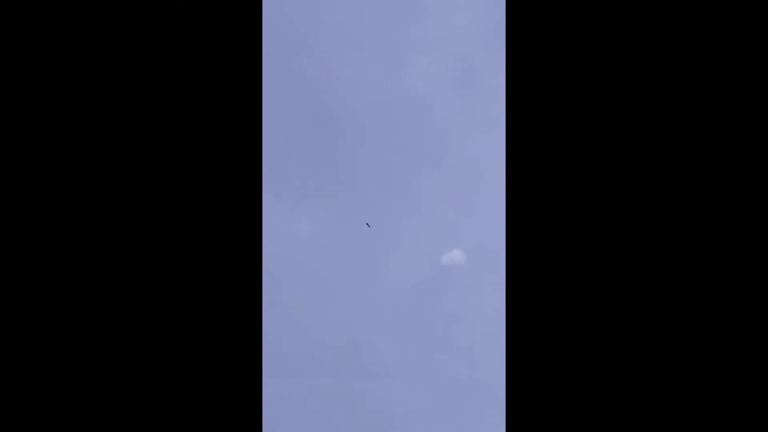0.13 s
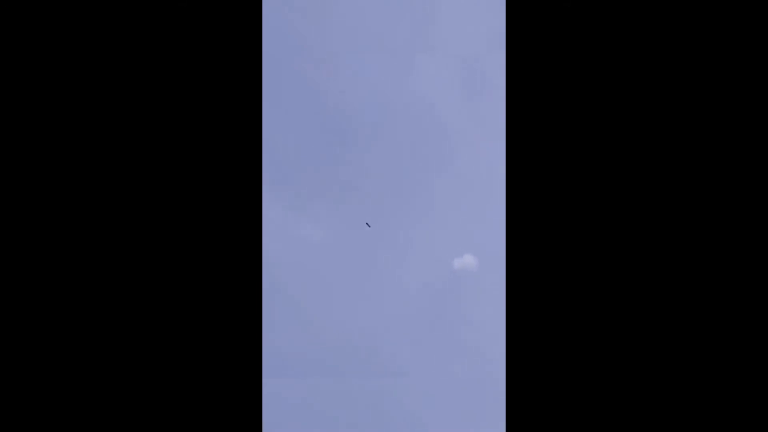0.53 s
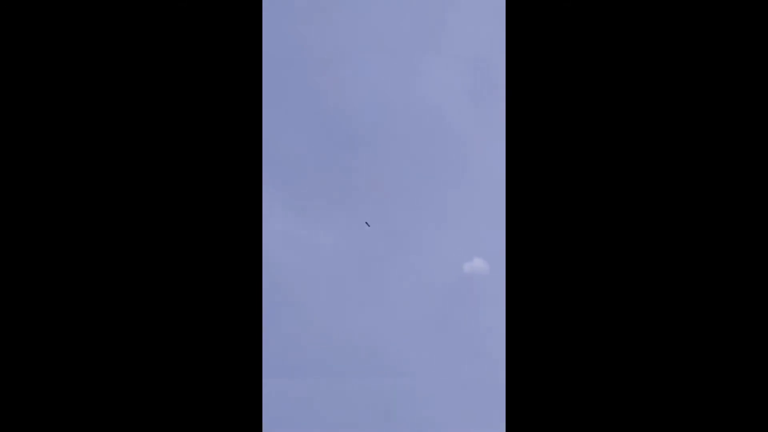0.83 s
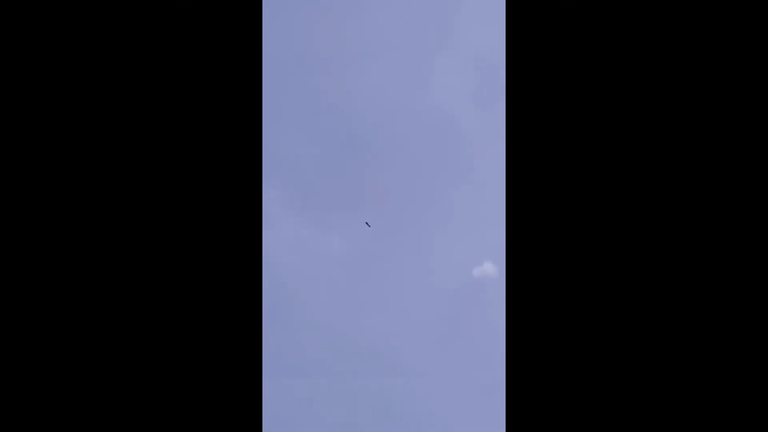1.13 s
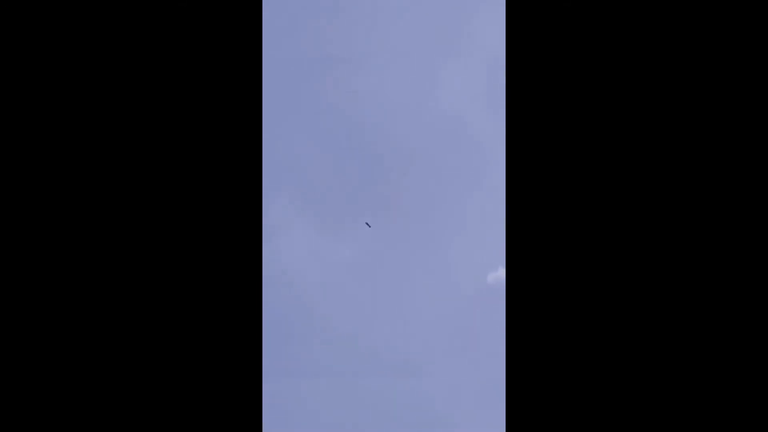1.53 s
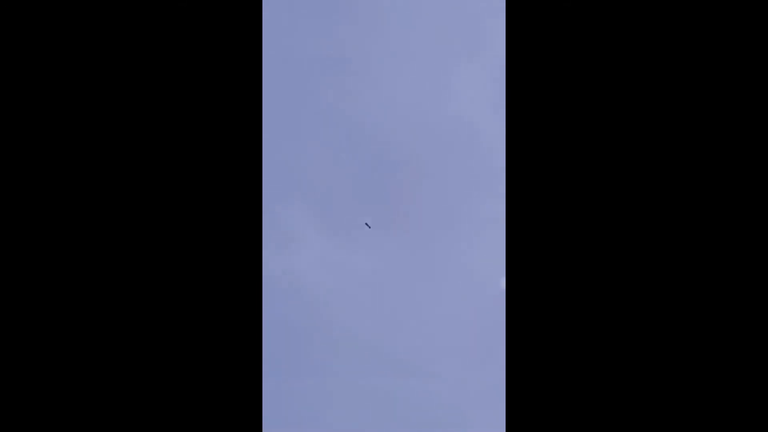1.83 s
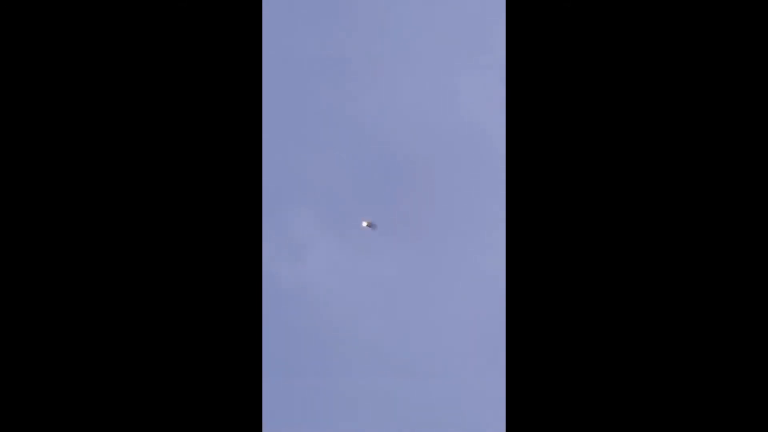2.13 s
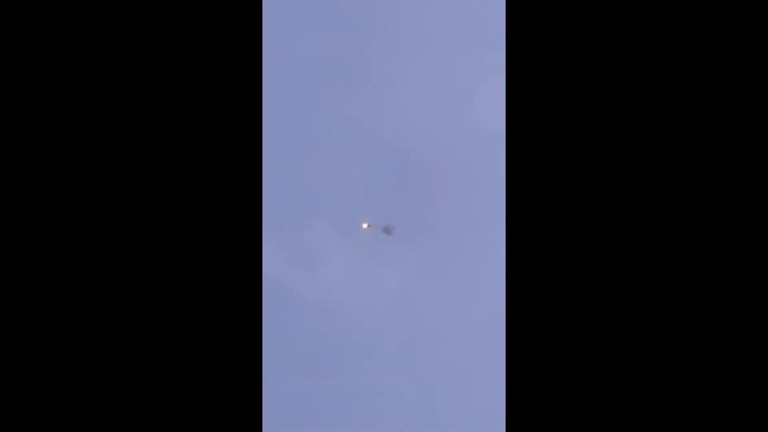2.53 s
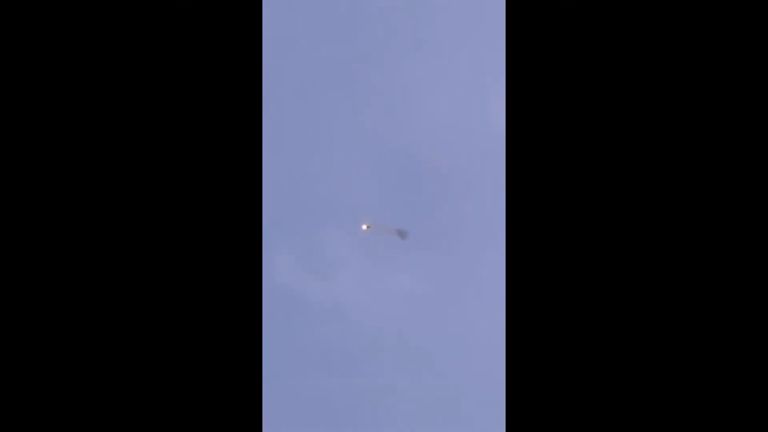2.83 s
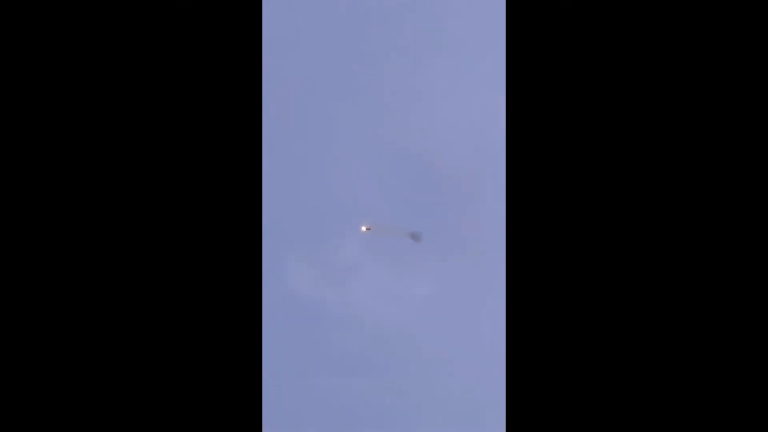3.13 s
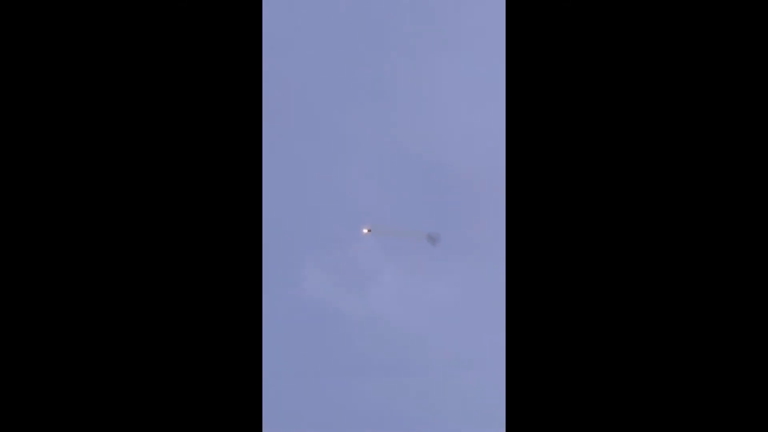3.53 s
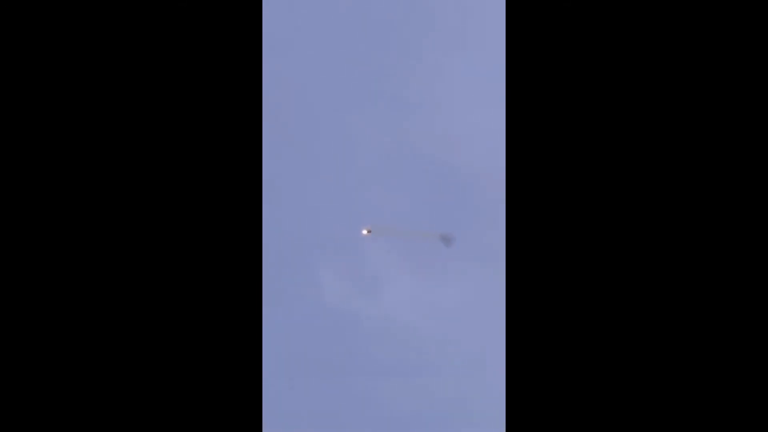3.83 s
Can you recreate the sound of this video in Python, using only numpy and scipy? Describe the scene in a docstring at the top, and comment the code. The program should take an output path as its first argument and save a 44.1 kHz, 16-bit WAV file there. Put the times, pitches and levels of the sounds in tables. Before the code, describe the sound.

Sonic boom of a high rocket, heard from far off in open country, in stereo. Until 1.85 s there is only quiet low wind, a soft distant rush swelling slightly and a faint steady tone from about 1 s. Whip-like bangs strike at 1.86, 2.12 and 2.25 s, with hiss and low thuds. Deep exhaust rumble surges on to 4 s, its roar fading, with irregular cracks, short echoes and grainy ground returns.

```python
"""Open country under a rocket climbing high; a stereo recorder stands far off in light wind.
Wind buffets over a distant rush and a faint far-off tone until the sonic boom arrives: three whip-like
bangs, each a pressure front swept from treble to bass, set in sprays of noise hiss with low thuds.
The exhaust rumbles on as shaped noise, surging and patchy, while its shock fronts crack one by one,
each with a weaker echo and a grainy return from the ground."""
import sys
import numpy as np
from scipy import signal
from scipy.fft import rfft, irfft
from scipy.io import wavfile
from scipy.ndimage import uniform_filter1d

SR = 44100
rng = np.random.default_rng(int(sys.argv[2]) if len(sys.argv) > 2 else 0)


def dump(signal):
    """Clip the signal to [-1, 1] and save it as 16-bit WAV at the path in sys.argv[1]."""
    limited = np.clip(np.atleast_2d(signal).T, -1, 1)
    pcm = np.round(limited * 32767).astype(np.int16)
    wavfile.write(sys.argv[1], SR, pcm)


N = 176400  # 4 s

# Every colour is a relative spectrum. Pans and treble pans are left over right, in dB.
# Light wind at the microphone, colour: pitch_hz, level_db (per Hz)
WIND_COLOUR = [(12, -19.5), (20, -1), (32, -10), (49, -6), (69, -0.5), (167, -6.5), (192, -8), (350, -16),
               (460, -44.5), (770, -120)]
WIND_DB, WIND_PAN_DB, WIND_GUST_DB = -36, 3, 0.8
WIND_LIKENESS = 0.78  # correlation of left and right

# Distant rush, level: time_s, level_db
RUSH_LEVEL = [(0, -42.5), (1.2, -41.5), (1.8, -38.5), (2.3, -49.5), (3, -47.5), (4, -41.5)]
# Distant rush, colour: pitch_hz, level_db (per Hz)
RUSH_COLOUR = [(150, -36), (260, -16), (400, -7.5), (520, -7), (700, -6), (1150, -8), (1800, -15.5),
               (2600, -25), (3600, -32), (5000, -44.5), (8000, -56.5)]
# Distant rush, likeness of left and right: pitch_hz, correlation
RUSH_LIKENESS = [(300, 0.55), (1200, 0.85), (2600, 0.93), (6000, 0.16)]
RUSH_DRIFT_DB = 0.31

# Far-off tone, level: time_s, level_db
HUM_LEVEL = [(1.0, -63), (1.15, -49.5), (1.85, -50), (2.5, -61.5)]
HUM_HZ, HUM_WAVER_HZ, HUM_WAVER_DB = 603.6, 1.2, 2

# Bangs of the boom: start_s, level_db (relative), treble_db (tilt)
BANGS = [(1.8614, -0.5, -2), (2.1247, -3.5, -7), (2.253, -2, -5)]
# Bang, colour: pitch_hz, level_db
BANG_COLOUR = [(20, -16), (45, 5.5), (100, 3.5), (190, 2.5), (320, 0.5), (500, -3.5), (1000, -8),
               (2000, -19), (4000, -24.5), (5700, -14.5), (7200, -27.5), (8600, -48), (13000, -49)]
# The recorder's two ports hear the sweep out of step: pitch_hz, left_lead_radians
PORT_PHASE = [(250, 0), (700, 0.4), (1250, 3.5), (2500, 4.5), (4000, 9), (5500, 8.5), (7000, 5)]
BANG_DB, BANG_TREBLE_PAN_DB = 32.5, -3.5
BANG_ECHO_S, BANG_ECHO_DB, BANG_ECHO_TREBLE_DB = 0.0101, -6.5, -11  # near reflection
SWEEP_S, SWEEP_POWER = 0.002108, 0.588  # delay at 1 kHz; it grows with the period to this power

# Sprays of hiss round the bangs: crest_s, level_db, half_length_s (to 1/e), pan_db
SPRAYS = [(1.864, -15.5, 0.0032, 5), (2.121, -20.5, .013, -3), (2.251, -22, 0.0091, 6.5)]
# Spray, colour: pitch_hz, level_db (per Hz)
SPRAY_COLOUR = [(200, 6), (1000, 8.5), (2500, 0.5), (4200, -7), (6000, -15.5), (8000, -21.5),
                (10000, -35.5), (13000, -47)]
HISS_LIKENESS = 0.15  # correlation of left and right, in sprays and exhaust hiss

# Exhaust, deep rumble surging: time_s, level_db
RUMBLE_LEVEL = [(1.87, -20), (1.93, -22), (2.0, -17), (2.06, -19), (2.15, -15), (2.19, -24), (2.23, -15.5),
                (2.33, -16.5), (2.42, -13.5), (2.88, -16), (2.93, -14.5), (2.97, -17), (3.19, -15),
                (3.23, -20), (3.27, -15.5), (3.47, -15.5), (3.5, -20), (3.53, -16.5), (3.72, -17),
                (3.77, -21), (3.88, -15), (4, -22)]
# Exhaust, roar: time_s, level_db
ROAR_LEVEL = [(1.87, -54), (1.95, -25.5), (2.06, -27.5), (2.42, -26.5), (2.72, -29), (2.98, -28.5),
              (3.2, -31), (3.35, -33), (4, -38.5)]
# Exhaust, hiss round the bangs and after: time_s, level_db
HISS_LEVEL = [(1.865, -38), (1.89, -44), (1.92, -37), (1.98, -34.5), (2.06, -41.5), (2.1, -35.5),
              (2.15, -42), (2.22, -30.5), (2.275, -46), (2.32, -38), (2.42, -38.5), (2.52, -48),
              (2.75, -59.5), (4, -54)]
# Rumble, colour: pitch_hz, level_db (per Hz)
RUMBLE_COLOUR = [(10, -15.5), (22, -3), (45, -1), (70, 0), (105, 1), (128, -3), (150, -12), (190, -14),
                 (240, -29.5), (400, -25.5), (1000, -93)]
# Roar, colour: pitch_hz, level_db (per Hz)
ROAR_COLOUR = [(100, 4.5), (250, 0.5), (380, 0), (550, -2.5), (750, -4), (1400, -15.5), (2600, -28),
               (4400, -41), (6000, -53), (9000, -76)]
# Hiss, colour: pitch_hz, level_db (per Hz)
HISS_COLOUR = [(400, 5.5), (1000, 7.5), (2600, 3.5), (4400, -4), (5700, -3.5), (6600, -12.5), (7600, -22.5),
               (9500, -54.5), (13000, -50)]
# Rumble and roar, likeness of left and right: pitch_hz, correlation
EXHAUST_LIKENESS = [(130, .965), (380, 0.92), (650, 0.57), (1200, .25), (2500, 0.55)]
ONSET_S = 0.011  # the exhaust fades in over this time
RUMBLE_EVEN_S = 0.086  # the rumble's own strength is evened out over this time
ROAR_FLUTTER_DB, HISS_FLUTTER_DB, HISS_GRIT_DB = 2, 2, 1.5
# Patches of the spectrum that swell and fade: depths, width, length
ROAR_PATCH_DB, HISS_PATCH_DB, PATCH_WIDTH_HZ, PATCH_S = 3.5, 6.5, 260, 0.06

# Dull thuds of the boom: start_s, peak_level_db, pitch_hz
THUDS = [(1.886, -12, 23.3), (1.998, -15.5, 113), (2.016, -6, 151), (2.095, -11, 119), (2.159, -14.5, 30.6)]
THUD_CYCLES = 0.56  # cycles up to the crest of a thud's envelope

# Shock cracks of the exhaust: start_s, level_db (relative), treble_db (tilt), echo_db (below its crack)
CRACKS = [(1.9441, -2.5, -1.5, -4), (2.0186, -6, -14, -18), (2.1170, -10, 2, -20),
          (2.2341, -0.5, -11, -1.5), (2.396, -1.5, 0.5, -4), (2.4615, -15.5, -7, -1),
          (2.6217, -11, -25.5, -13), (2.853, -3.5, -17, -22), (3.0653, 0, -21, -12),
          (3.1140, -17.5, -9, -12), (3.25, -4, -19, -14), (3.2969, -9, -12.5, -12),
          (3.348, -12.5, -21, -16), (3.4231, -9.5, -7, -4.5), (3.4320, -8, -12.5, -6),
          (3.5361, -4, -3.5, -15.5), (3.6333, -6.5, -7.5, -9), (3.6753, -15, -12, -14),
          (3.7065, -6.5, -10, -10.5), (3.8996, -5, -5, -8.5), (3.9389, -15, -5, -4)]
# Crack, colour: pitch_hz, level_db
CRACK_COLOUR = [(20, 1.5), (100, 7.5), (300, 0), (700, -2.5), (1500, -8.5), (2500, -11), (3800, -27),
                (5800, -21.5), (7800, -27), (9500, -52.5), (13000, -65)]
CRACK_DB = 21
ECHO_S, ECHO_TREBLE_DB = 0.0304, -5.5
# Faint fronts among the cracks, level relative to them
CRACKLE_PER_S, CRACKLE_DB, CRACKLE_SPREAD_DB, CRACKLE_TREBLE_DB = 71, -26, 6.5, -17.5
# Grainy return of each front, colour: pitch_hz, level_db
SCATTER_COLOUR = [(200, -2.5), (1500, -12.5), (3500, 13.5), (7000, 13)]
SCATTER_DB, SCATTER_S, SCATTER_GRAIN_DB = -20.5, 0.018, 9  # level before colour, crest time, grain spread
CRACK_SIDE_DB, CRACK_SIDE_S = -15, 0.00082  # stereo burst at each front: level, decay time
FRONT_GRAIN_DB, FRONT_GRAIN_S = -3.5, 0.0055  # ragged tail of each front: level, decay time

# Recorder's own hiss, colour: pitch_hz, level_db (per Hz)
SELF_NOISE_COLOUR = [(1000, -6.5), (6000, 3.5), (13000, -1)]
SELF_NOISE_DB, TOP_HZ = -63, 13300

LEFT_RIGHT = np.array([[1], [-1]])


def undb(db):
    """Decibels to gain."""
    return 10 ** (np.asarray(db) / 20)


def curve(rows):
    """A table's second column joined by straight lines in time."""
    rows = np.array(rows)
    return np.interp(np.arange(N) / SR, rows[:, 0], rows[:, 1])


def bins(size):
    """Frequencies of a spectrum, kept above zero."""
    return np.maximum(np.arange(size // 2 + 1) * SR / size, 1)


def along(points, hz):
    """Points joined on a log-frequency axis."""
    points = np.array(points)
    return np.interp(np.log(hz), np.log(points[:, 0]), points[:, 1])


def walk(rate_hz):
    """Random motion with a spread of 1, its spectrum falling away smoothly around the rate."""
    slow = irfft(rfft(rng.standard_normal(N)) * np.exp(-(bins(N) / rate_hz) ** 2), N)
    return slow / slow.std()


def noise(colour, likeness):
    """Stereo noise of rms 1 with a given colour and left-right correlation."""
    likeness = np.clip(likeness, -1, 1)
    mid, side = rfft(rng.standard_normal((2, N))) * undb(along(colour, bins(N)))
    spectra = mid * np.sqrt(1 + likeness) + LEFT_RIGHT * side * np.sqrt(1 - likeness)
    out = irfft(spectra, N)
    return out / out.std()


def front(colour, treble_db, size=4096):
    """Spectrum of a causal pressure jump; the air has taken more or less of its treble."""
    hz = bins(size)
    tilt = along([(1200, 0.13), (5500, 0.93), (10000, 1.8)], hz)
    cepstrum = irfft(np.log(undb(along(colour, hz) + treble_db * tilt)))
    # Folding the cepstrum gives minimum phase: nothing sounds ahead of the front
    cepstrum[1:size // 2] *= 2
    cepstrum[size // 2 + 1:] = 0
    return -np.exp(rfft(cepstrum))


def add(out, at_s, sound):
    """Mixes a sound in at a time."""
    i = int(np.clip(round(at_s * SR), 0, N))
    out[..., i:i + sound.shape[-1]] += sound[..., :N - i]


def wind():
    """Light wind at the microphone: low noise, alike in both channels, that gusts a little."""
    level_db = WIND_DB + WIND_GUST_DB * walk(6.6) + LEFT_RIGHT * WIND_PAN_DB / 2
    return noise(WIND_COLOUR, WIND_LIKENESS) * undb(level_db)


def distant_rush():
    """Distant rush: noise that swells towards the boom, sinks after it and comes up again."""
    rush = noise(RUSH_COLOUR, along(RUSH_LIKENESS, bins(N)))
    return rush * undb(curve(RUSH_LEVEL) + RUSH_DRIFT_DB * walk(1.7))


def hum():
    """A faint far-off tone, a sine wavering in pitch and level, up before the boom covers it."""
    hz = HUM_HZ + HUM_WAVER_HZ * walk(2)
    tone = np.sqrt(2) * np.sin(2 * np.pi * np.cumsum(hz) / SR)
    return undb(curve(HUM_LEVEL) + HUM_WAVER_DB * walk(9.2)) * tone


def bangs(size=4096):
    """Each bang arrives treble first and falls to the bass in a few ms; a near reflection follows."""
    out, hz = np.zeros((2, N)), bins(size)
    delay_s = SWEEP_S * (1000 / np.maximum(hz, 60)) ** SWEEP_POWER
    # Delay summed over frequency is the phase of the sweep
    sweep_phase = 2 * np.pi * np.cumsum(delay_s) * SR / size
    falling = np.exp(1j * (LEFT_RIGHT / 2 * along(PORT_PHASE, hz) - sweep_phase))
    arrivals = [(0, 0, 0), (BANG_ECHO_S, BANG_ECHO_DB, BANG_ECHO_TREBLE_DB)]  # direct, reflected
    for start_s, level_db, treble_db in BANGS:
        for late_s, gain_db, dull_db in arrivals:
            ports = np.array([front(BANG_COLOUR, treble_db + dull_db + side * BANG_TREBLE_PAN_DB)
                              for side in (0.5, -0.5)])
            add(out, start_s + late_s, undb(BANG_DB + level_db + gain_db) * irfft(ports * falling))
    return out


def sprays():
    """Short swells of bright noise hiss in which the bangs sit."""
    t = np.arange(N) / SR
    swell = np.zeros((2, N))
    for crest_s, level_db, half_length_s, pan_db in SPRAYS:
        bell = np.exp(-((t - crest_s) / half_length_s) ** 2)
        swell += undb(level_db + LEFT_RIGHT / 2 * pan_db) * bell
    return noise(SPRAY_COLOUR, HISS_LIKENESS) * swell


def patchy(sound, depth_db, size=1024):
    """Patches of the noise's spectrum swell and fade at random."""
    spectra = signal.stft(sound, nperseg=size)[2]
    field = rng.standard_normal(spectra.shape[1:])
    spans = [PATCH_WIDTH_HZ * size / SR, PATCH_S * 2 * SR / size]  # bins, frames
    for axis, span in enumerate(spans):
        field = uniform_filter1d(field, max(1, round(span)), axis=axis)
    gain = undb(depth_db * np.tanh(field / field.std()))
    gain = gain / np.sqrt(np.mean(gain ** 2))
    return signal.istft(spectra * gain, nperseg=size)[1][:, :N]


def exhaust():
    """Surging rumble, patchy roar and gritty hiss, all noise arriving behind the first bang."""
    likeness = along(EXHAUST_LIKENESS, bins(N))
    deep = noise(RUMBLE_COLOUR, likeness)
    strength = np.sqrt(uniform_filter1d(np.mean(deep ** 2, axis=0), int(RUMBLE_EVEN_S * SR)))
    rumble = deep / strength * undb(curve(RUMBLE_LEVEL))

    roar = patchy(noise(ROAR_COLOUR, likeness), ROAR_PATCH_DB)
    roar = roar * undb(curve(ROAR_LEVEL) + ROAR_FLUTTER_DB * walk(54))

    hiss = patchy(noise(HISS_COLOUR, HISS_LIKENESS), HISS_PATCH_DB)
    hiss_db = curve(HISS_LEVEL) + HISS_FLUTTER_DB * walk(53) + HISS_GRIT_DB * walk(500)
    hiss = hiss * undb(hiss_db)

    onset = np.clip((np.arange(N) / SR - BANGS[0][0]) / ONSET_S, 0, 1)
    return (rumble + roar + hiss) * onset


def thuds():
    """Low pressure swings of the boom that die within a few cycles."""
    out, t = np.zeros(N), np.arange(SR // 2) / SR
    for start_s, peak_db, pitch_hz in THUDS:
        age = t * pitch_hz / THUD_CYCLES
        envelope = age * np.exp(1 - age)
        add(out, start_s, undb(peak_db) * envelope * np.sin(2 * np.pi * pitch_hz * t))
    return out


def ground_return(size=4096):
    """What follows each front: a grainy return from the ground, a stereo burst and a ragged tail."""
    t = np.arange(size) / SR
    grains = rng.standard_normal((2, size)) * undb(SCATTER_GRAIN_DB * rng.standard_normal(size))
    far = grains * t * np.exp(-t / SCATTER_S)
    far_gain = undb(SCATTER_DB + along(SCATTER_COLOUR, bins(size)))
    far = irfft(rfft(far / np.linalg.norm(far[0])) * far_gain)
    near = rng.standard_normal((2, size)) * np.exp(-t / CRACK_SIDE_S)
    near = undb(CRACK_SIDE_DB) * near / np.linalg.norm(near[0])
    ragged = rng.standard_normal(size) * np.exp(-t / FRONT_GRAIN_S)
    ragged = undb(FRONT_GRAIN_DB) * ragged / np.linalg.norm(ragged)
    return far + near + ragged


def cracks():
    """Single shock fronts, each with a duller echo and a ground return, among many faint ones."""
    out = np.zeros(N)
    for start_s, level_db, treble_db, echo_db in CRACKS:
        crack = irfft(front(CRACK_COLOUR, treble_db))
        echo = irfft(front(CRACK_COLOUR, treble_db + ECHO_TREBLE_DB))
        add(out, start_s, undb(level_db) * crack)
        add(out, start_s + ECHO_S, undb(level_db + echo_db) * echo)
    faint = irfft(front(CRACK_COLOUR, CRACKLE_TREBLE_DB))
    # Random gaps, counted from the first bang
    times = BANGS[0][0] + np.cumsum(rng.exponential(size=200)) / CRACKLE_PER_S
    for start_s, strength in zip(times, rng.standard_normal(size=200)):
        add(out, start_s, undb(CRACKLE_DB + CRACKLE_SPREAD_DB * min(strength, 1)) * faint)
    returned = signal.fftconvolve(out[None], ground_return(), axes=1)[:, :N]
    return undb(CRACK_DB) * (out + returned)


def scene():
    """Everything heard under the open sky."""
    before = wind() + distant_rush() + hum()
    boom = bangs() + sprays() + thuds()
    return before + boom + exhaust() + cracks()


def record(dry):
    """The recorder adds its own faint hiss, clips at full scale and cuts the top."""
    wet = np.clip(dry + undb(SELF_NOISE_DB) * noise(SELF_NOISE_COLOUR, 0), -1, 1)
    return signal.sosfilt(signal.ellip(8, 0.2, 70, TOP_HZ, fs=SR, output="sos"), wet)


dry = scene()
out = record(dry)
dump(out)
```